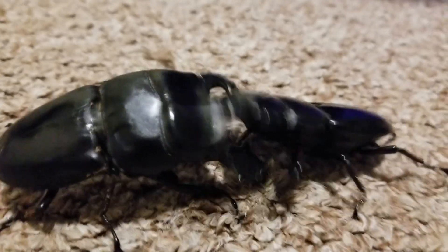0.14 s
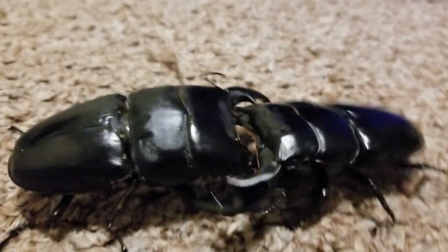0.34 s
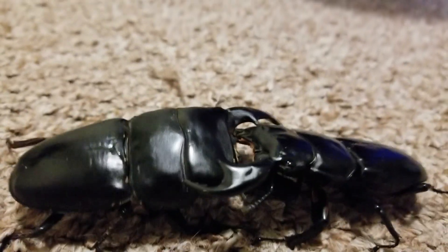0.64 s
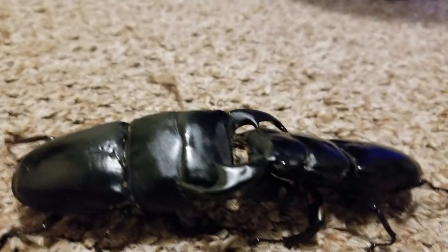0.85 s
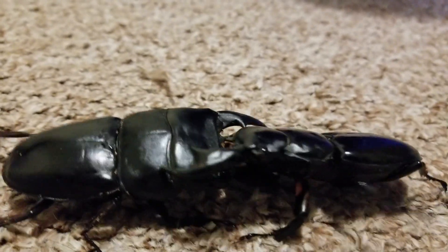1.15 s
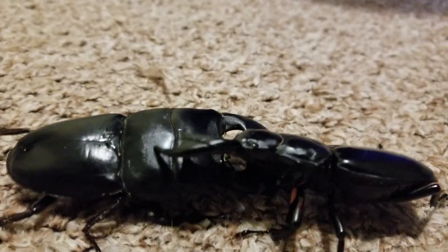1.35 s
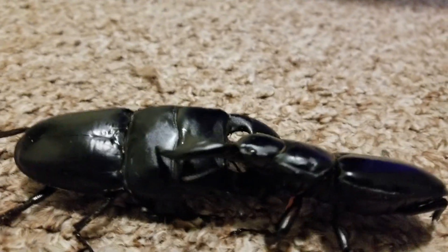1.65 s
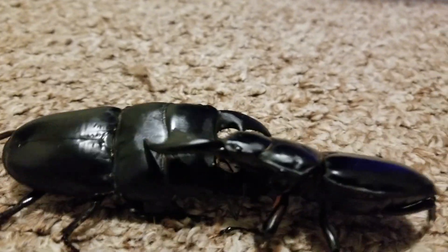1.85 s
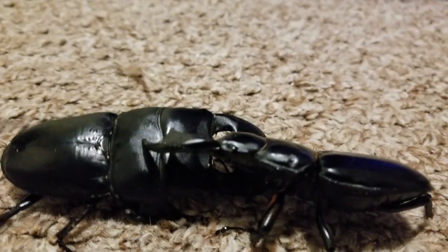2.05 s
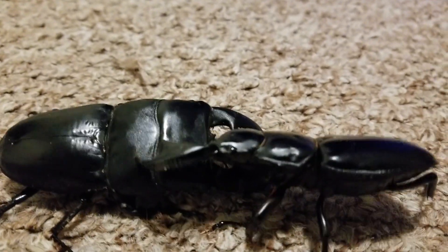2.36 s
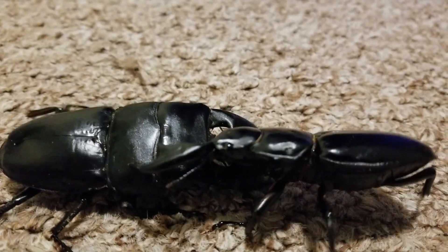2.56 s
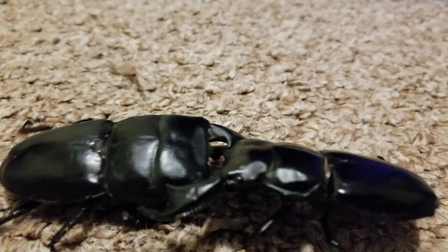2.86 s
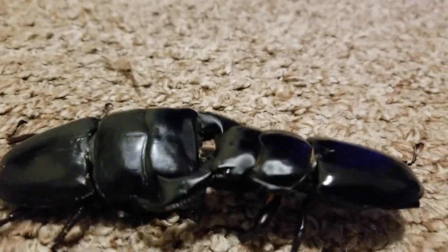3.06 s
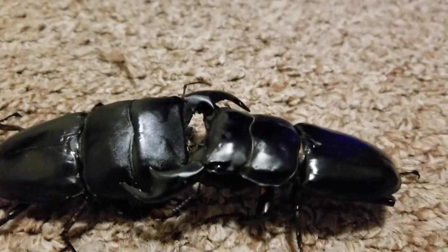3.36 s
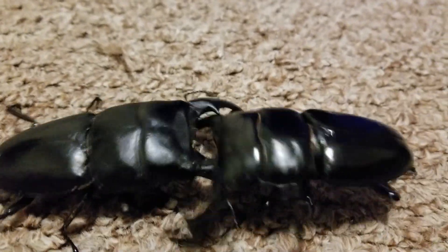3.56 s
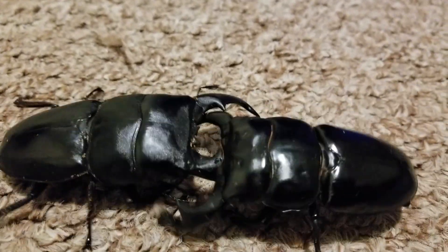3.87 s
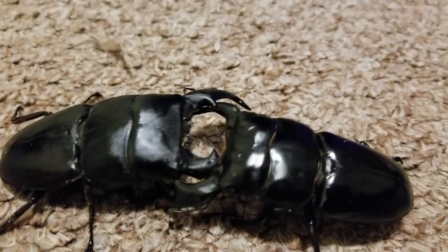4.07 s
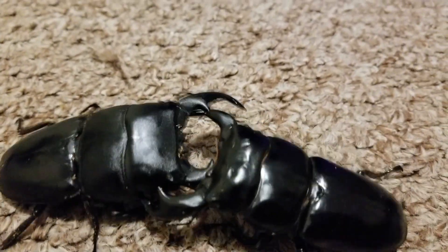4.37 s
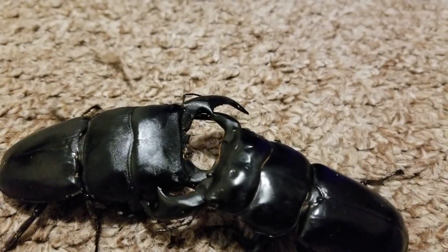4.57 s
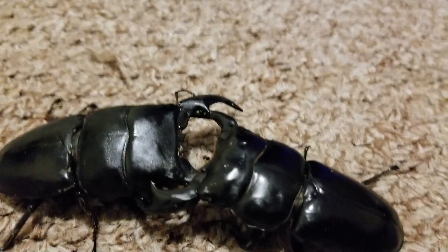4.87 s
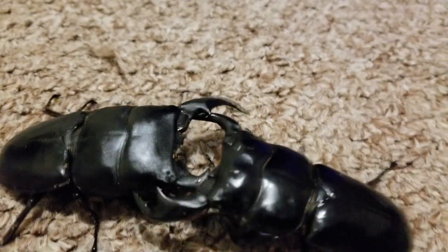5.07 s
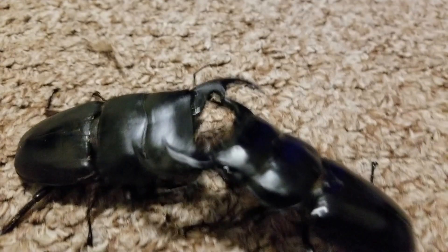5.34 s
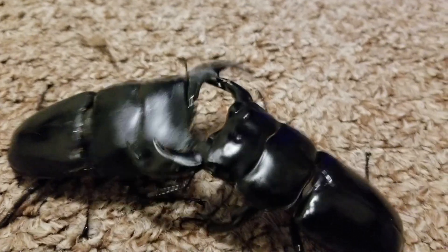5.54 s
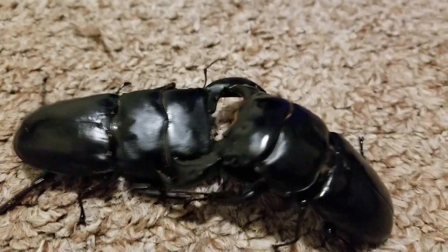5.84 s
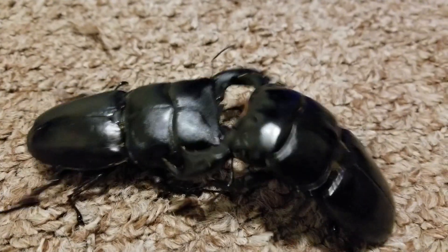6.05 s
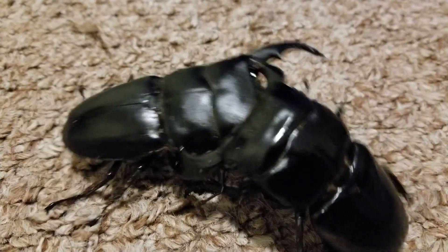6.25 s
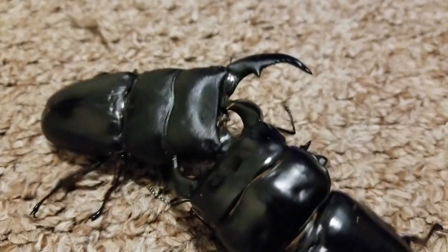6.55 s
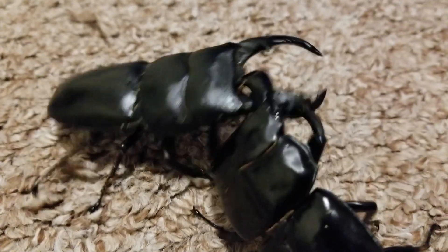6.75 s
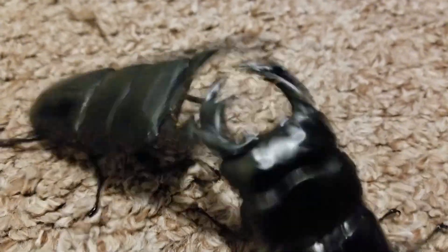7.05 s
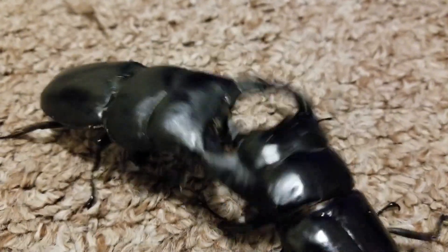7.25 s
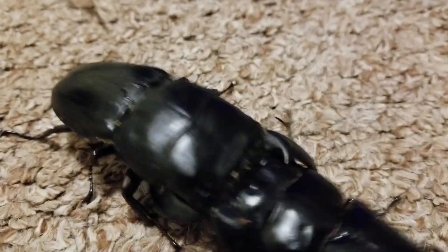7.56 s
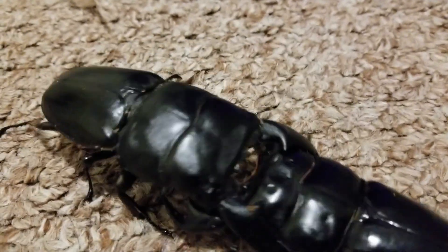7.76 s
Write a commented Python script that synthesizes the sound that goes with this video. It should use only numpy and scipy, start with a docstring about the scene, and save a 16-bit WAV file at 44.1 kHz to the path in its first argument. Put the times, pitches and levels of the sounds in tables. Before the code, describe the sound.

Close-up beetle fight on carpet: sharp irregular clicks, brief creaks, rasping claws, a few dull microphone bumps and quiet house hum.

```python
"""The low murmur of a quiet house comes first, with wavering hums and faint hiss, then scratches and snaps. Two
stag beetles wrestle on a looped carpet, close to a hand-held stereo microphone. Jaws and armour snap and creak
as they slip: short noise bursts coloured like shell, with a short room tail. Claws drag through the pile:
showers of tiny random snags over a fizz of noise. A finger now and then bumps (dying sines) and rubs (rough
noise) the casing beside the left port, and clicks on it once near 3.2 s."""
import sys
import numpy as np
from scipy import signal
from scipy.fft import rfft, irfft
from scipy.io import wavfile

SR = 44100
rng = np.random.default_rng(int(sys.argv[2]) if len(sys.argv) > 2 else 0)


def dump(signal):
    """Clip the signal to [-1, 1] and save it as 16-bit WAV at the path in sys.argv[1]."""
    limited = np.clip(np.atleast_2d(signal).T, -1, 1)
    pcm = np.round(limited * 32767).astype(np.int16)
    wavfile.write(sys.argv[1], SR, pcm)


N = 348831  # length in samples, about 7.9 s


def amp(db):
    """Turns decibels into a plain factor."""
    return 10 ** (np.asarray(db) / 20)


def evened(x):
    """Scales a sound to an average (RMS) level of one."""
    return x / np.sqrt(np.mean(x ** 2) + 1e-20)


def read(points, hz):
    """Reads a table of (Hz, value) at any frequency, evenly along the musical scale."""
    f, value = np.transpose(points)
    return np.interp(np.log(hz + 1), np.log(f), value)


def over_time(points, s):
    """Reads a table of (second, value) at any moment."""
    return np.interp(s, *np.transpose(points))


def left_right(db):
    """Splits a level difference in dB into a factor for each port; positive favours the left."""
    return amp(db * np.array([[.5], [-.5]]))


def add(mix, s, sound):
    """Lays a sound into the mix at s seconds."""
    part = mix[:, max(round(s * SR), 0):][:, :sound.shape[1]]
    part += sound[:, :part.shape[1]]


def drift(size, per_s):
    """A smooth random wander of unit size, with per_s new turns a second."""
    knots = rng.standard_normal(4000)
    return evened(np.interp(np.arange(size) * per_s / SR, np.arange(4000), knots))


def coloured(x, gain_db):
    """Filters without sounding ahead of time; gain_db is a function of frequency."""
    log_gain = np.log(amp(gain_db(abs(np.fft.fftfreq(1024, 1 / SR)))))
    taps = np.fft.ifft(np.exp(np.conj(signal.hilbert(log_gain)))).real  # minimum phase
    return signal.fftconvolve(x, taps[None], axes=1)


def tilted(spectrum, body_db, bright_db):
    """Heavy contacts shake the whole body; fine tips excite the treble."""
    tilt = [(1700, body_db), (3500, 0.027), (6800, 0.033), (10500, bright_db)]
    return lambda hz: read(spectrum, hz) + read(tilt, hz)


def placed(x, energy, pan_db):
    """Shares a sound's energy between the two ports."""
    unit = x / np.linalg.norm(x, axis=1, keepdims=True)
    return unit * evened(left_right(pan_db)) * np.sqrt(energy)


# Colour of the house murmur. Each row: frequency in Hz, strength in dB per Hz (only the shape counts).
MURMUR_SPECTRUM = [(20, -26), (40, -11.5), (62, 1.5), (86, -5), (130, -4), (270, -3), (350, -12),
                   (500, -16), (720, -26.5), (1500, -29.5), (2600, -30.5), (4800, -34.5), (8500, -44),
                   (13000, -33.5), (16000, -41)]
# Loudness of the murmur over time. Each row: time in seconds, level in dB before a fixed lift.
MURMUR_LEVEL = [(0.0, -59), (0.57, -55.5), (1.45, -55), (2.3, -62.5), (2.75, -59), (3.55, -62.5),
                (4.08, -56), (6.3, -55), (7.0, -54.5), (7.91, -54)]
# How alike the murmur is at both ports. Each row: frequency in Hz, likeness (1 is the same, 0 is unrelated).
MURMUR_LIKENESS = [(60, 0.96), (290, 0.81), (640, 0.59), (1400, 0), (15000, 0)]
# Which port hears more murmur. Each row: frequency in Hz, left over right in dB.
MURMUR_SIDE = [(60, -0.5), (1300, -2), (2400, 9.5), (4400, -0.5), (8000, 3.5), (15000, -0.5)]
# Low hums in the room. Each row: frequency in Hz, level in dB relative to the murmur, before wavering.
HUMS = [(70, -19), (118, -11.5), (172, -8)]


def air(lift_db=1):
    """The low murmur of the house, alike at both ports in the bass, with wavering hums and faint hiss."""
    hz, t = np.fft.rfftfreq(N, 1 / SR), np.arange(N) / SR
    left, other = rfft(rng.standard_normal((2, N)))
    same = np.clip(read(MURMUR_LIKENESS, hz), -1, 1)
    right = same * left + np.sqrt(1 - same ** 2) * other
    shape = amp(read(MURMUR_SPECTRUM, hz)) * left_right(read(MURMUR_SIDE, hz))
    murmur = evened(irfft(np.array([left, right]) * shape, N))
    hum = np.zeros(N)
    for f, db in HUMS:
        tone = np.sin(2 * np.pi * f * t + 0.62 * drift(N, 7.9))
        hum += amp(db) * evened(tone * (1 + 0.79 * drift(N, 6.8)))
    return amp(lift_db + over_time(MURMUR_LEVEL, t)) * (murmur + hum)


# How long the room rings. Each row: frequency in Hz, time to fall by 60 dB in seconds.
ROOM_DECAY = [(200, 0.13), (1300, 0.29), (4000, 0.29), (9000, 0.27), (15000, 0.2)]
# Tone of the room's answer. Each row: frequency in Hz, gain in dB (only the shape counts).
ROOM_COLOUR = [(200, 16.5), (600, 11.5), (1500, 9), (5000, 2), (8000, 4), (13500, 6), (16000, 11.5)]


def room(x, build_s=0.0092):
    """A small furnished room: scattered reflections build up, then fade, with the middle lasting longest."""
    n = SR // 2
    hits = rng.random((2, n)) < 6000 / SR  # about 6000 reflections a second
    build = np.clip(np.arange(n) / SR / build_s, 0, 1) ** 2
    reflections = rng.standard_normal((2, n)) * hits * build
    hz, t, z = signal.stft(reflections, SR, nperseg=256)
    fade_db = read(ROOM_COLOUR, hz)[:, None] - 60 * t / read(ROOM_DECAY, hz)[:, None]
    tail = signal.istft(z * amp(fade_db), SR, nperseg=256)[1]
    both_ports = x.sum(0)[None] / np.sqrt(2)
    return signal.fftconvolve(both_ports, tail / np.linalg.norm(tail[0]), axes=1)[:, :N]


# Finger knocks on the casing. Each row: time in seconds, peak level in dB before the final filters, pitch in Hz.
KNOCKS = [(1.2824, -13, 114), (1.4687, -22.5, 214), (1.5132, -27.5, 167), (1.5616, -23, 191),
          (1.586, -33, 416), (1.6033, -8, 237), (2.9484, -39, 179), (3.2516, -25.5, 142), (3.258, -31, 168),
          (3.2837, -25.5, 183), (4.1234, -33, 374), (4.3758, -16.5, 486)]


def finger_knocks(damping=3.6, edge=0.26, low_cut=0.67, casing=0.051, casing_hz=150, casing_s=0.0093):
    """Each knock is a sine that dies within a cycle or so, sharpened at its start."""
    out, t = np.zeros((1, N)), np.arange(2500) / SR
    casing_ring = casing * np.sin(2 * np.pi * casing_hz * t) * np.exp(-t / casing_s)
    for s, db, hz in KNOCKS:
        cycles = hz * t
        thud = np.sin(2 * np.pi * cycles) * np.exp(-damping * cycles)
        thud += edge * np.cos(2 * np.pi * cycles) * np.exp(-5 * cycles)
        thud += casing_ring  # the casing rings on briefly
        thud = signal.lfilter(*signal.butter(1, low_cut * hz, "high", fs=SR), thud)
        thud = signal.lfilter(*signal.butter(2, 1300 + 4.5 * hz, fs=SR), thud)  # soft skin dulls the blow
        add(out, s - 0.16 / hz, amp(db) * thud[None] / abs(thud).max())
    return out


# Finger slides on the casing. Each row: start in seconds, loudest moment in seconds, end in seconds,
# level in dB before swell and grain, pitch as a factor on the skin spectrum.
RUBS = [(3.062, 3.155, 3.18, -45, 1.04), (3.239, 3.279, 3.3, -44.5, 0.47),
        (4.118, 4.109, 4.16, -48.5, 0.88), (4.203, 4.28, 4.328, -39.5, 0.92),
        (4.371, 4.398, 4.424, -38.5, 0.57)]
# Colour of skin on the casing. Each row: frequency in Hz, strength in dB per Hz (only the shape counts).
SKIN = [(40, -13), (200, -5.5), (700, 2), (1200, 0), (2200, -2.5), (3000, -9.5), (4500, -14), (7000, -25),
        (15000, -36.5)]


def finger_rubs(grain_db=1.0):
    """Skin friction is rough noise that swells and fades with the finger's force."""
    out = np.zeros((1, N))
    for start, top, end, db, pitch in RUBS:
        t = np.arange(start, end, 1 / SR)
        grain = amp(grain_db * drift(len(t), 403))
        force = np.interp(t, [start, top, end], [0, 1, 0]) ** 0.47 * grain
        rough = rng.laplace(size=(1, SR // 4))
        skin = evened(coloured(rough, lambda hz: read(SKIN, hz / pitch))[:, :len(t)])
        add(out, start, amp(db) * force * skin)
    return out


def finger(leak_db=-23):
    """Knocks and rubs travel through the casing, nearly all to the left port."""
    return (finger_knocks() + finger_rubs()) * amp([[0], [leak_db]])


# Colour of claws in carpet pile. Each row: frequency in Hz, strength in dB per Hz (only the shape counts).
PILE = [(60, -5.5), (250, -2), (700, -4.5), (1200, -8), (1900, -5), (3000, -2.5), (4600, 0.5), (6400, -5.5),
        (7700, -12), (9800, -8), (12700, -1), (15500, -11), (16500, -36)]
# How hard the legs push; the stray taps use it too. Each row: time in seconds, push in dB.
SHOVING = [(0, -14), (1.0, -10), (1.85, 2.5), (2.1, -11.5), (2.55, -26.5), (2.9, -7.5), (3.8, -5),
           (4.6, -15), (5.2, -3), (7.9, 1)]


def feet(ticks_per_s=70, spread_db=5.0, level_db=-67.0):
    """Faint ticks of claws shifting in the loops, louder while the beetles shove."""
    busy_db = over_time(SHOVING, np.arange(N) / SR)
    sizes = amp(spread_db * np.minimum(rng.exponential(1, N), 4))
    ticks = sizes * (rng.random(N) < ticks_per_s / SR)
    fading = signal.lfilter([1], [1, -np.exp(-1 / (0.0014 * SR))], ticks)  # each fades over 1.4 ms
    rustle = fading * rng.standard_normal((2, N))
    return amp(level_db + busy_db) * evened(coloured(rustle, tilted(PILE, 3.7, -1.3))[:, :N])


# How much later the right port hears the beetles. Each row: time in seconds, lag in seconds.
LAG = [(0, 0.00015), (3.5, 0.00017), (5.2, 0.00011), (6.2, .00014), (7.2, 0.00014), (7.7, 0.000077)]


def ports(x, s):
    """One sound as it reaches the two ports from where the beetles are at time s."""
    hz = np.fft.rfftfreq(len(x), 1 / SR)
    turn = np.exp(-2j * np.pi * hz * over_time(LAG, s))
    return np.array([x, irfft(rfft(x) * turn, len(x))])


# Strokes of claws through the pile and along shells. Each row: start in seconds, end in seconds,
# level in dB before port colour, body in dB, brightness in dB, left over right in dB.
SCRAPES = [(0.067, 0.166, -60.5, 3, -4, -10), (0.168, 0.198, -34, -8, 2.5, 0),
           (0.338, 0.366, -63.5, -12, -7, -6), (0.612, 0.696, -61.5, 12, -2, -8),
           (0.87, 0.98, -65.5, -9, -2, -21), (1.167, 1.186, -38.5, 0, -9, -4),
           (1.195, 1.262, -55, 1, -16, -10), (1.27, 1.326, -46, 13, 0, 3), (1.474, 1.5, -47, 2.5, -3, -1),
           (1.735, 1.858, -59, 7, 2, -1), (2.237, 2.31, -56.5, 5, -2, -2), (2.924, 3.018, -65.5, 9, -6, 0),
           (3.215, 3.29, -55.5, -3, -8, -1), (3.414, 3.44, -62.5, 1, -6, 4),
           (3.55, 3.581, -57.5, 0.5, -0.5, -3), (3.909, 3.965, -64, -4, -10, 2),
           (4.12, 4.155, -55, 3, -3, 10), (4.345, 4.365, -50, 12, -3, 1),
           (5.127, 5.175, -50.5, 2.5, -6.5, -1), (5.328, 5.374, -52.5, 1, -3, 10),
           (5.541, 5.56, -40, -7.5, -5, -1), (5.717, 5.76, -50, 3.5, -7, -6.5),
           (5.813, 5.873, -55.5, 3, -13, -5), (6.091, 6.11, -30, -5.5, -7, -7.5),
           (6.104, 6.18, -44.5, -7, -3, 3), (6.31, 6.4, -53, 4.5, -4, -1),
           (6.4, 6.501, -46, -0.5, -2.5, 1.5), (6.501, 6.704, -55, 7, -5, -0.5),
           (6.702, 6.711, -30, -2.5, -4.5, 1.5), (6.729, 6.78, -48, 0, -4, 2), (6.823, 6.862, -60, 9, 5, 2),
           (6.988, 7.025, -52, 8, -3, 0.5), (7.015, 7.064, -35, -11, 9, 3), (7.109, 7.189, -54, -16, 0, 0),
           (7.263, 7.308, -49, -20, -6, 8), (7.385, 7.404, -58, 4, -3, 2), (7.405, 7.423, -36, -4, -3, -1),
           (7.523, 7.559, -44, 1, -4.5, -2.5), (7.824, 7.847, -51, -1.5, -8, 0)]


def scrapes(strokes, snags_per_s=1000, spread_db=4.5, fizz=0.22, clump_db=4.5, lead_s=0.0091,
            release_s=0.0013):
    """A stroke is a clumped shower of tiny snags over the fizz of sliding fibres; it builds up and lets go."""
    out, t = np.zeros((2, N)), np.arange(-SR // 25, SR // 2) / SR
    for start, end, db, body_db, bright_db, pan_db in strokes:
        length = max(end - start, .004)
        sizes = amp(spread_db * np.minimum(rng.exponential(1, (3, len(t))), 4))
        sizes = sizes * rng.choice([-1, 1], sizes.shape)
        snags = sizes * (rng.random(sizes.shape) < snags_per_s / SR)
        snags = snags + fizz * rng.standard_normal(sizes.shape)
        lead = lead_s * np.sqrt(length / 0.08)  # long strokes start more gently
        build_up = np.minimum(t - lead, 0) / lead
        let_go = np.maximum(t - length + release_s, 0) / release_s
        force = np.exp(build_up - let_go) * amp(clump_db * drift(len(t), 220.9))
        # one shower reaches both ports, two more belong to one port each
        push = (ports(snags[0], start) + snags[1:]) * force
        sound = coloured(push, tilted(PILE, body_db, bright_db))
        add(out, start + t[0], amp(db) * placed(sound, length * SR, pan_db))
    return out


def crack(s, t, rise_s, fall_s, ring_s):
    """A slip gathers for an instant, breaks, and leaves the shell buzzing; its spectrum is broad and fairly even."""
    swell = np.exp(np.minimum(t, 0) / rise_s - np.maximum(t, 0) / fall_s)
    buzz = .07 * np.exp(np.minimum(t, 0) / (5 * rise_s) - np.maximum(t, 0) / ring_s)
    z = rfft(swell * rng.standard_normal(len(t)))
    snap = irfft(z / (abs(z) + 1e-9) ** .75, len(t))  # flattens most of the spectrum's bumps
    return ports(snap / np.linalg.norm(snap), s) + buzz * rng.standard_normal((2, len(t)))


# Colour of a struck shell. Each row: frequency in Hz, strength in dB per Hz (only the shape counts).
SHELL = [(60, -11.5), (200, -14.5), (550, -4), (850, -12), (1150, -8.5), (2000, -9), (2600, -3.5),
         (3400, 0), (4900, 5.5), (6400, 3), (7800, -5), (9800, -1.5), (12500, 2.5), (15500, -4),
         (17000, -27)]


def clicks(slips, rise_s=0.00015, fall_s=0.00024, ring_s=0.0027, detune=0.0077):
    """Slips ring the shell; returns the direct sound and what spreads into the room."""
    direct, feed, t = np.zeros((2, N)), np.zeros((2, N)), np.arange(-132, 636) / SR
    energy = SR / 500  # levels count over 2 ms
    for s, db, body_db, bright_db, pan_db, room_db in slips:
        shell = tilted(SHELL, body_db, bright_db)
        size = np.exp(detune * rng.standard_normal())
        sound = coloured(crack(s, t, rise_s, fall_s, ring_s), lambda hz: shell(hz * size))
        add(direct, s + t[0], amp(db) * placed(sound, energy, pan_db))
        pulse = coloured(np.ones((2, 1)), shell)
        add(feed, s, amp(db + room_db) * placed(pulse, energy, 0))
    return direct, feed


def jolts(slips, thump_hz=195, decay_s=0.0029, level_db=-17):
    """Slips jolt the heavy bodies against the floor; loud slips with much body thump hardest."""
    out, t = np.zeros((2, N)), np.arange(3000) / SR
    thump = np.sin(2 * np.pi * thump_hz * t) * np.exp(-t / decay_s)
    for s, db, body_db, *_ in slips:
        add(out, s, amp(db + level_db + body_db / 2) * thump[None])
    return out


def small_slips(times, levels_db, body_db, spread_db=2, bright_db=-4, colour_db=4.0, sway_db=8, room_db=-14.5):
    """Each small slip lands on a new spot, with its own force, colour and side; in the columns of SNAPS."""
    rows = []
    for s, db, chance in zip(times, levels_db, rng.standard_normal((len(times), 4))):
        force, body, tip, side = chance
        rows.append((s, db + spread_db * force, body_db + colour_db * body,
                     bright_db + colour_db * tip, sway_db * side, room_db))
    return rows


def stray_slips(count=20, level_db=-54, follows=0.54, body_db=6):
    """Light taps of legs on armour come at random, oftener and harder while the beetles shove."""
    t = np.linspace(0, N / SR, 800)
    busy_db = over_time(SHOVING, t)
    due = np.cumsum(amp(busy_db))
    at = np.searchsorted(due, due[-1] * (np.arange(count) + rng.random(count)) / count)
    return small_slips(t[at], level_db + follows * busy_db[at], body_db)


# Jaws under load creak in runs of small slips. Each row: start in seconds, end in seconds,
# number of slips, average level in dB, average body in dB.
CREAKS = [(1.175, 1.246, 7, -34.5, 4), (1.481, 1.496, 2, -40, -12), (1.609, 1.663, 2, -46, 11),
          (1.744, 1.849, 9, -37.5, -1), (1.849, 1.914, 3, -46, 8)]


def creak_slips(jitter=.2):
    """A loaded jaw sticks and slips at an uneven pace."""
    rows = []
    for start, end, count, db, body_db in CREAKS:
        turns = np.arange(round(count)) + .5 + jitter * rng.standard_normal(round(count))
        times = start + (end - start) * turns / len(turns)
        rows += small_slips(times, np.full(len(turns), db), body_db)
    return rows


# Snaps of jaws and armour, and near 3.2 s one click of a finger on the casing. Each row: time in seconds, level
# over 2 ms in dB before port colour, # body in dB, brightness in dB, left over right in dB, share sent to the
# room in dB.
SNAPS = [(0.1097, -32.5, 4, -1, 1, -6.5), (0.1966, -25, 0.5, 2.5, 3, -13.5), (0.46, -48.5, 11, -18, 5, -13),
         (0.593, -47, 15, 0, 8, -16), (0.6407, -43, 10, -1, -4, -13), (0.9133, -45, 14, 1, -6, -4),
         (1.0736, -38.5, 15, 2.5, -5, -11), (1.1731, -37.5, 15, -3, -7, -8), (1.221, -32, 4, -2, 0, -5.5),
         (1.272, -29.5, 4, -7, 3, -3.5), (1.3484, -29.5, -8, -10, -0.5, -12.5), (1.4006, -33, 13, 2, 3, -8),
         (1.4137, -19.5, -1, 5, 0.5, -7), (1.5664, -35.5, 8, -1, 4, -5.5), (1.687, -38.5, 12, 7, -5, -18),
         (1.711, -32.5, 5.5, 1, 0.5, -10.5), (1.741, -32, -4, -2, -4, -5), (1.7855, -35, -2, -2, 4, -22),
         (1.8261, -32.5, -15, 0.5, 12, -11), (2.206, -51.5, 0, -2, 4, -3), (2.2533, -39, 10, -2.5, 0, -9),
         (2.627, -53, 1, 3, -2, -19), (2.6545, -17, 6, 6, 4, -10), (2.731, -38, 16, -11, 3, -29),
         (2.7938, -38, 10, -3.5, 8, -13.5), (3.2057, -43, 20.5, -3, 26, -9), (3.723, -49, 11, -2, 25, -12),
         (3.8311, -43, 5.5, -3, -2, -16), (3.9719, -28.5, -8.5, -4.5, 1, -10.5),
         (4.2323, -41, -6, -6, -2, -10), (4.8, -47.5, -4, -8, 21, -11), (4.9199, -49, 9, -2, -1, -4),
         (4.976, -43, 22, -15, 0, -9), (5.062, -23, 10, 1, 3.5, -13), (5.151, -41, 11, -10, 11, -13),
         (5.2279, -39, 18, -8, 4, -12.5), (5.3167, -42, 11.5, -2, -6, -7.5), (5.3568, -39, 11, 1, -8, -29),
         (5.555, -25, -1, -4.5, -6, -14), (5.7526, -34.5, -10, -7.5, -5, -13),
         (6.0376, -32.5, 5.5, -7, -4, -10), (6.0873, -26.5, 1, -12, 7, -26), (6.098, -25.5, 5, 18, 18, -22),
         (6.1023, -22.5, 8.5, -11, 14, -26), (6.1839, -24, 3.5, 0.5, 0.5, -16),
         (6.7126, -27, -7, -4, 14, -21), (6.7707, -31.5, 11, 7, 12, -21),
         (6.8041, -33.5, 1, -6.5, -4.5, -13), (7.0204, -32, 1.5, -6, 0, -3), (7.052, -30, -9, 5, -8, -13),
         (7.1646, -41.5, -4, -6, 3, -3), (7.4069, -24, -4, -10, -8, -13.5),
         (7.4102, -20.5, -5.5, 11, 7, -16.5), (7.671, -44, -10, 4, 0, -21),
         (7.6984, -19, -2.5, -3, -31, -13), (7.7021, -24, 21.5, 13, 27, -25),
         (7.877, -17.5, 3, -14.5, -5, -18.5)]


def snap_slips(rebound_s=.0042, rebound_db=-18.5):
    """A snapped jaw catches again: each snap is a slip and its weaker rebound, in the columns of SNAPS."""
    waits = rebound_s * np.exp(.2 * rng.standard_normal(len(SNAPS)))
    rebounds = [(s + wait, db + rebound_db, *colour) for (s, db, *colour), wait in zip(SNAPS, waits)]
    return list(SNAPS) + rebounds


def grazes(before_s=0.0055, after_s=0.0087, graze_db=-26, tip_db=-2):
    """The short stroke of shell on shell around each snap, in the columns of SCRAPES."""
    return [(s - before_s, s + after_s, db + graze_db, body_db / 2, bright_db / 2 + tip_db, pan_db / 2)
            for s, db, body_db, bright_db, pan_db, _ in SNAPS]


# The two ports have their own resonances. Each row: frequency in Hz, left over right in dB.
PORT_COLOUR = [(500, 2.5), (2000, 2), (3100, 12.5), (4000, 10.5), (4800, -4), (6500, -16.5), (7700, 0),
               (9600, 1), (11400, -10), (15000, -2)]


def port_colour(x):
    """Each port favours its own bands of the near sound."""
    side = left_right(read(PORT_COLOUR, np.fft.rfftfreq(N, 1 / SR)))
    return irfft(rfft(x) * side / np.sqrt(np.mean(side ** 2, axis=0)), N)


def scene(scrape_room_db=-10):
    """The beetles and their room, the hand, the background."""
    slips = snap_slips() + creak_slips() + stray_slips()
    snaps, feed = clicks(slips)
    scratching = scrapes(list(SCRAPES) + grazes()) + feet()
    beetles = port_colour(snaps + scratching) + jolts(slips)
    return beetles + room(feed + amp(scrape_room_db) * scratching) + finger() + air()


def record(dry, low_cut_hz=48, edge_hz=16500):
    """The microphone opens after a moment and sheds the deepest bass; then the treble ends at edge_hz."""
    opened = np.clip((np.arange(N) / SR - .04) / .005, 0, 1)
    low_cut = signal.butter(3, low_cut_hz, "high", fs=SR, output="sos")
    thinned = signal.sosfilt(low_cut, dry * opened)
    band_limit = signal.firwin(255, edge_hz, window=("kaiser", 9), fs=SR)
    return signal.oaconvolve(thinned, band_limit[None], "same")


dry = scene()
out = record(dry)
dump(out)
```